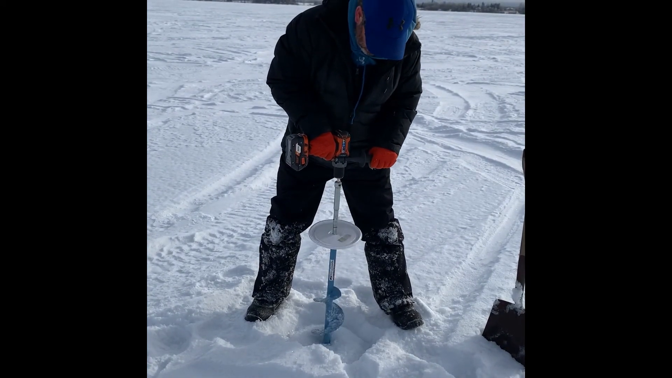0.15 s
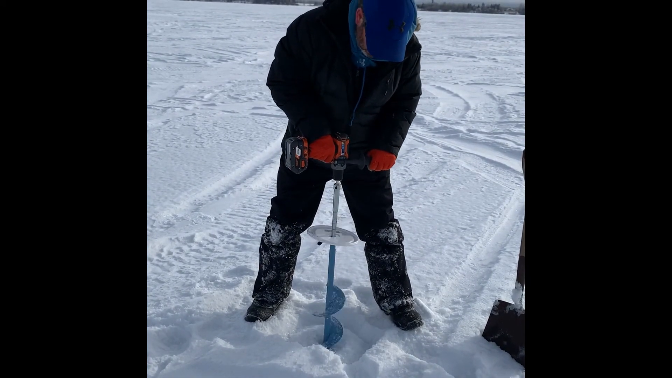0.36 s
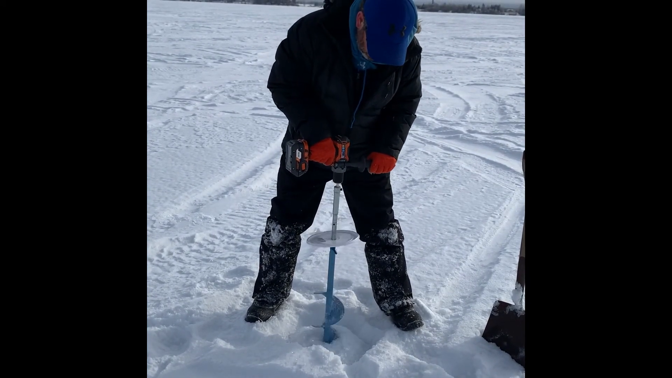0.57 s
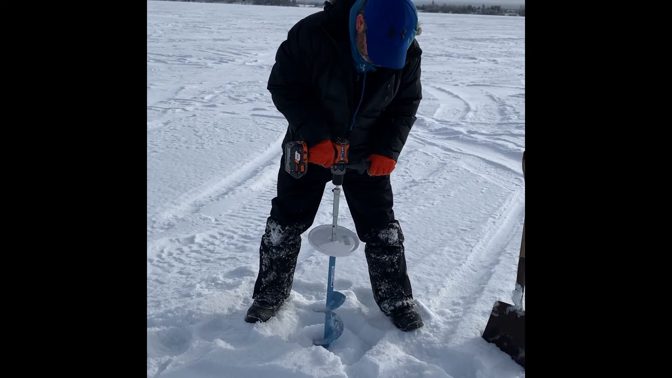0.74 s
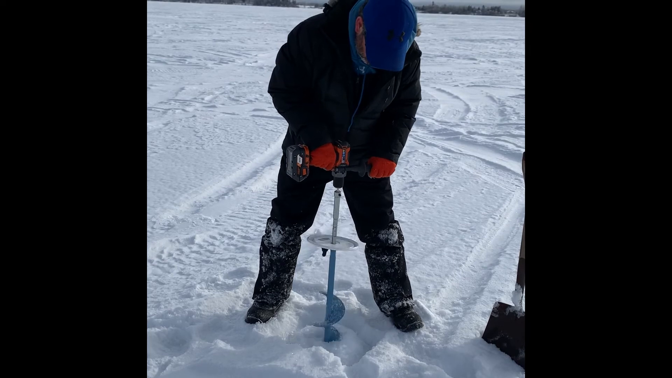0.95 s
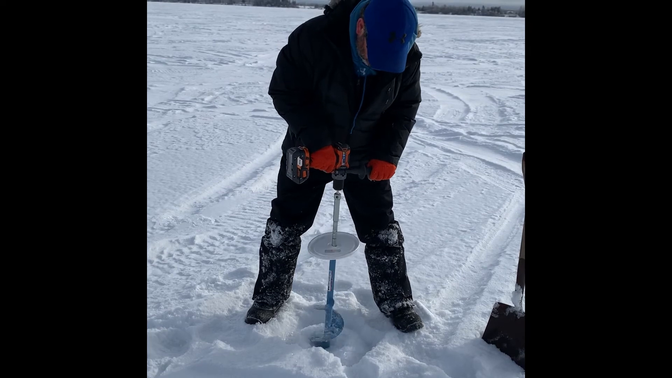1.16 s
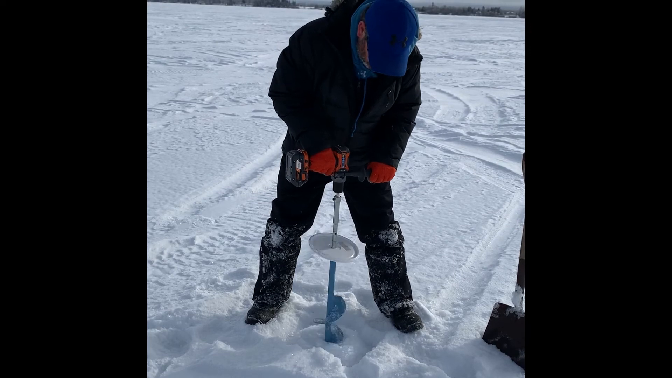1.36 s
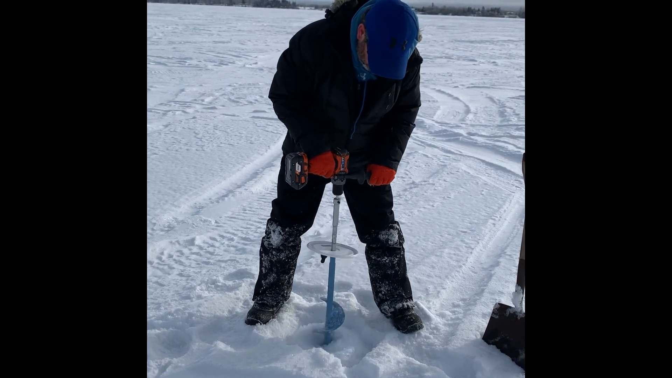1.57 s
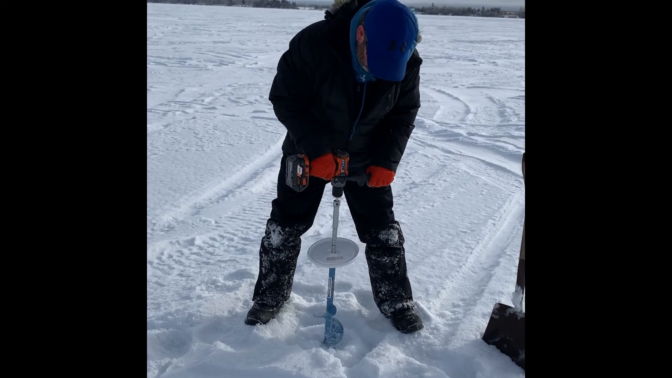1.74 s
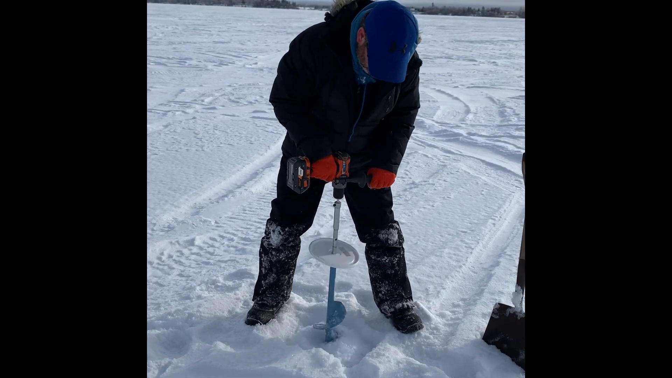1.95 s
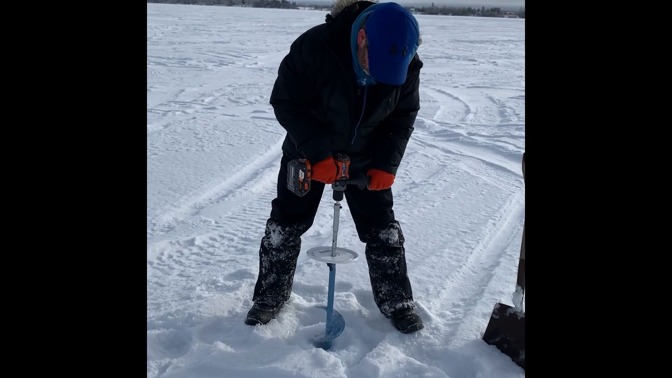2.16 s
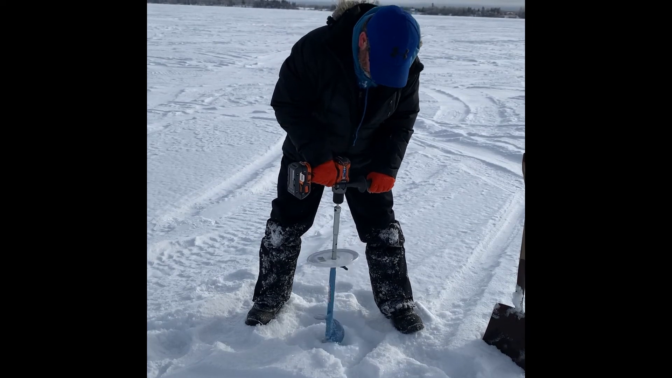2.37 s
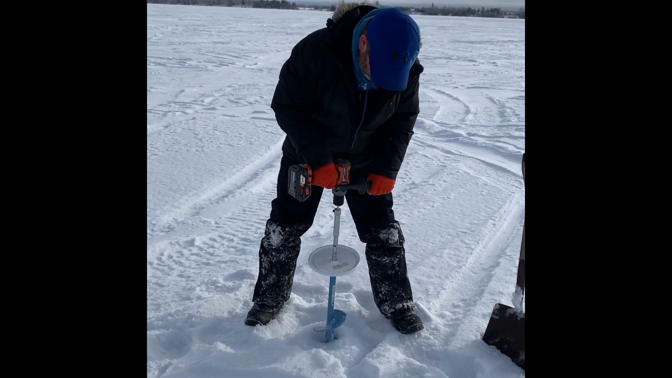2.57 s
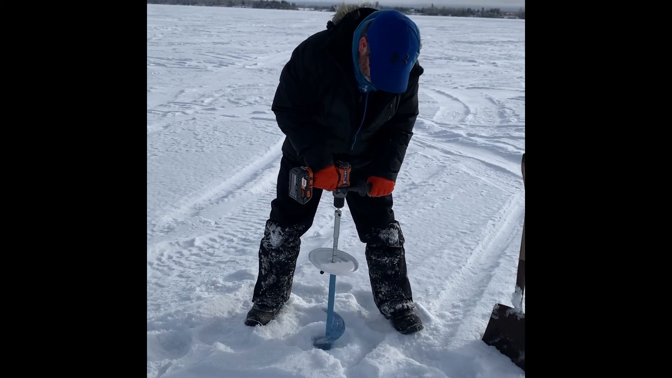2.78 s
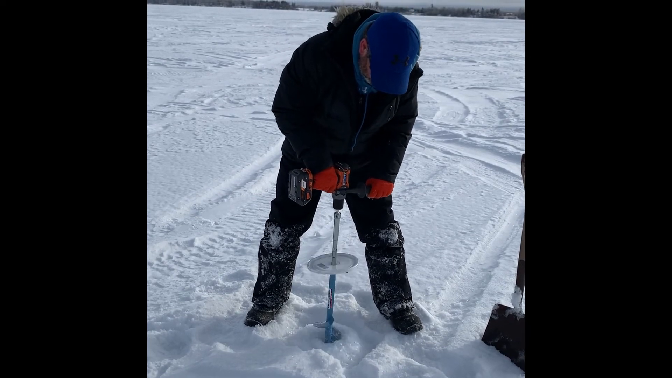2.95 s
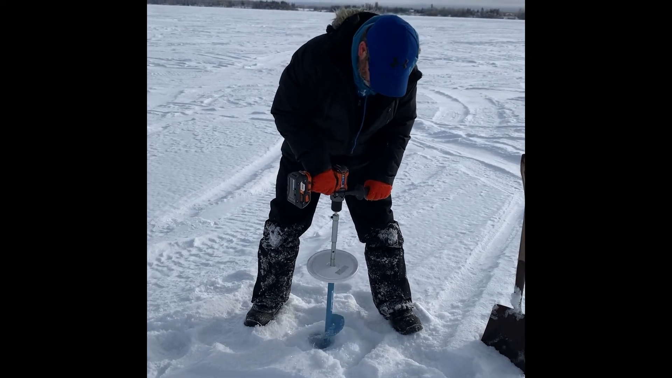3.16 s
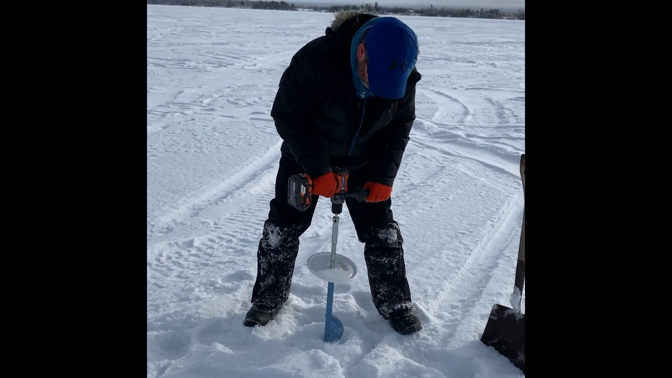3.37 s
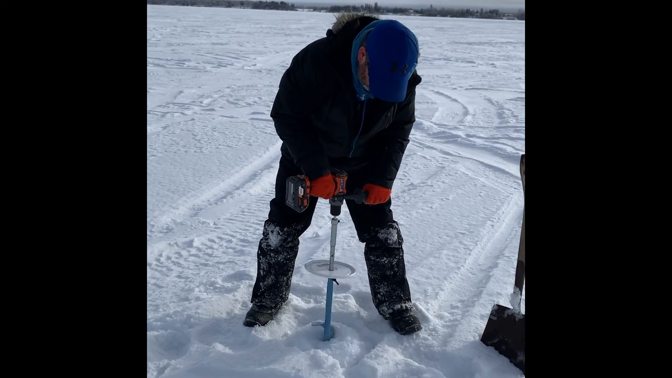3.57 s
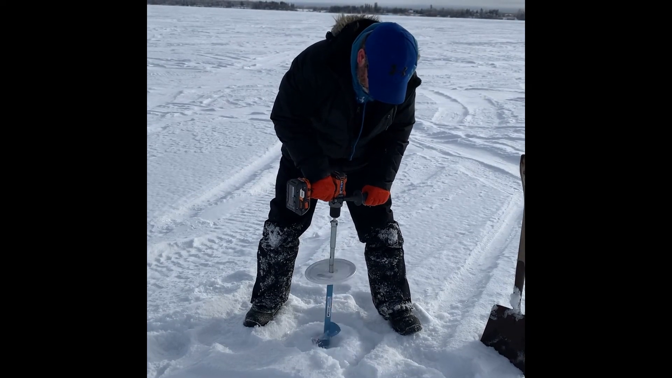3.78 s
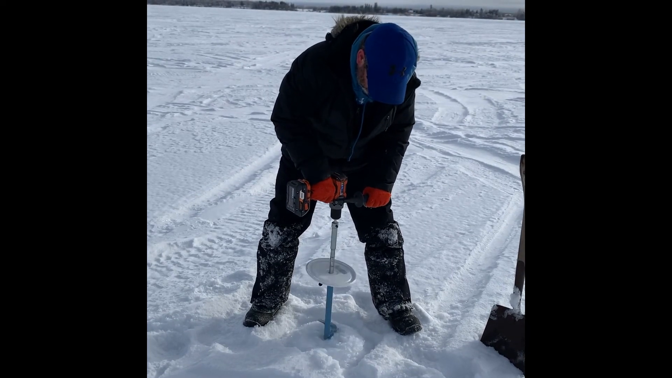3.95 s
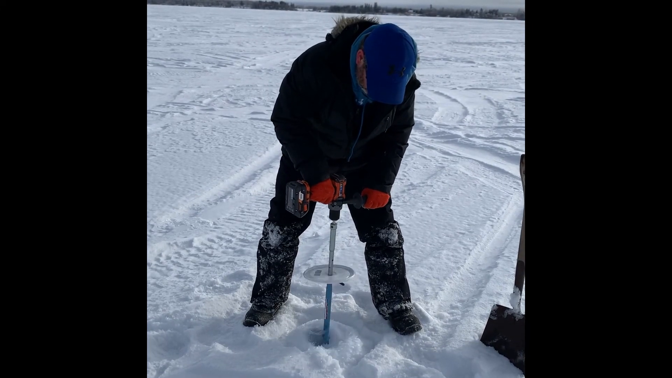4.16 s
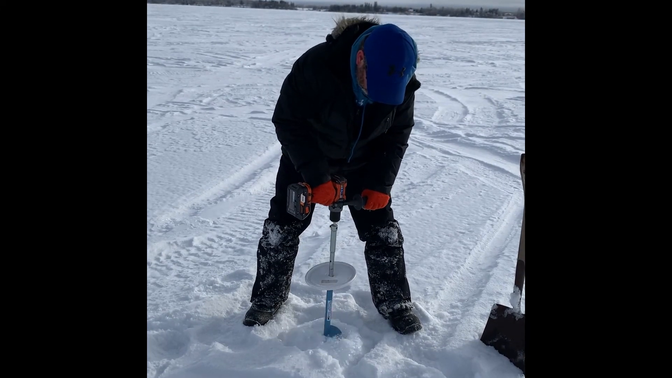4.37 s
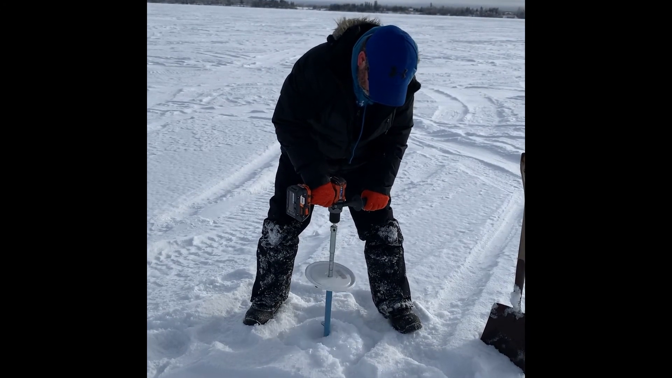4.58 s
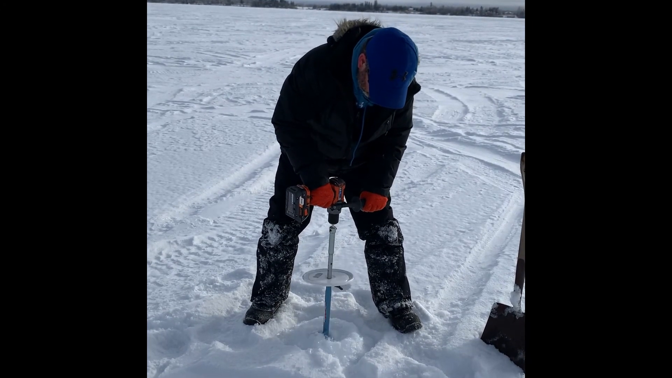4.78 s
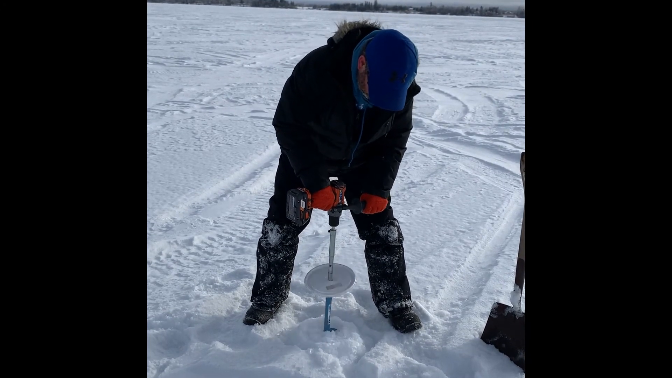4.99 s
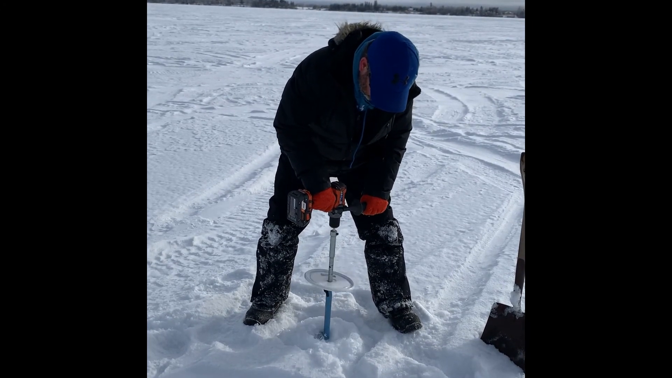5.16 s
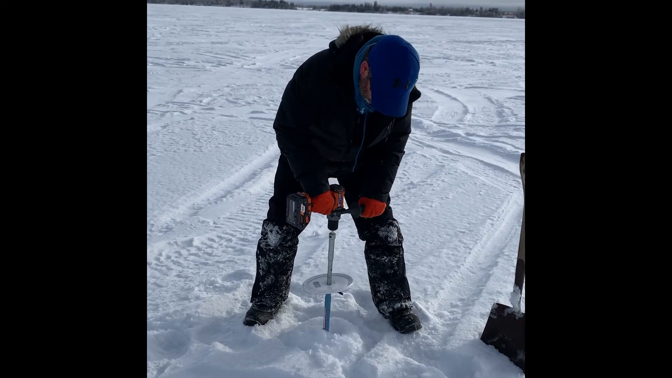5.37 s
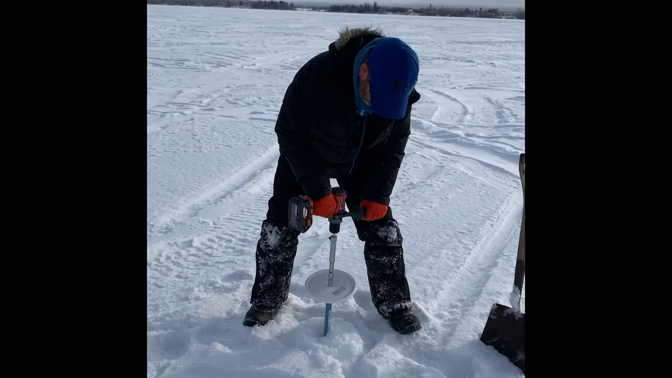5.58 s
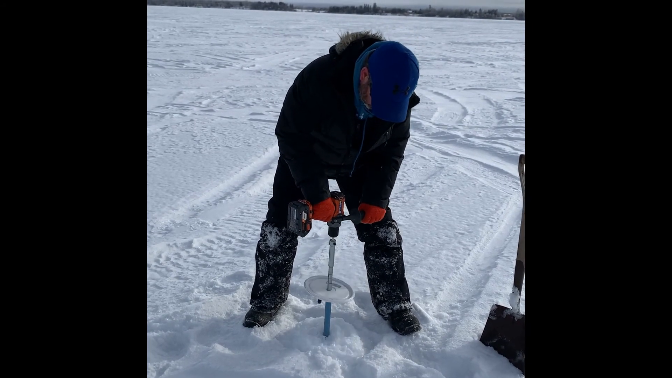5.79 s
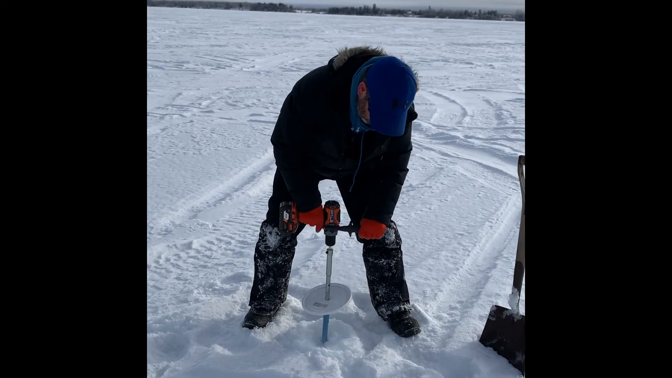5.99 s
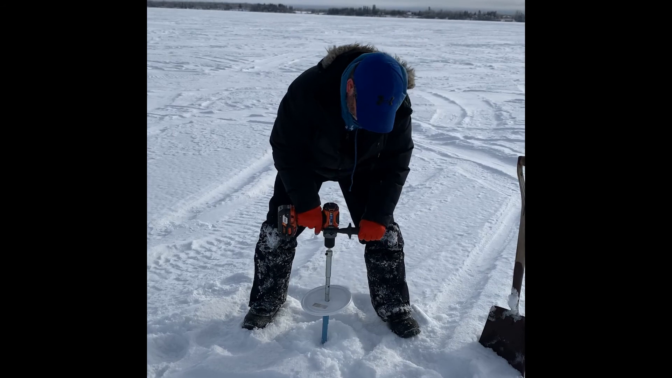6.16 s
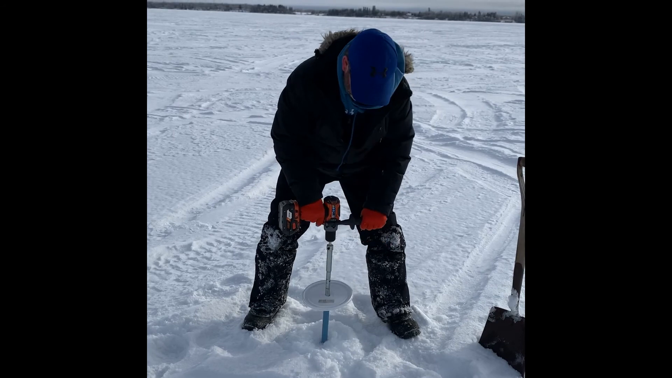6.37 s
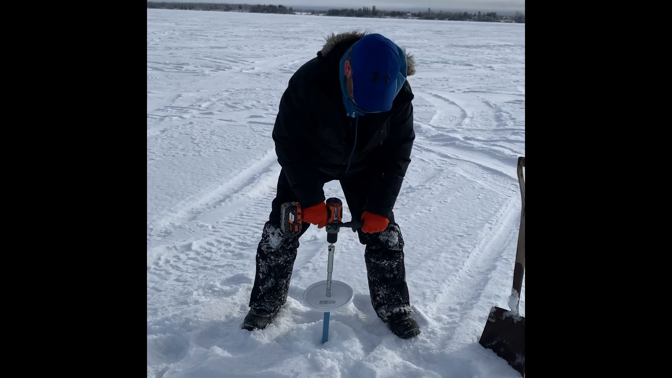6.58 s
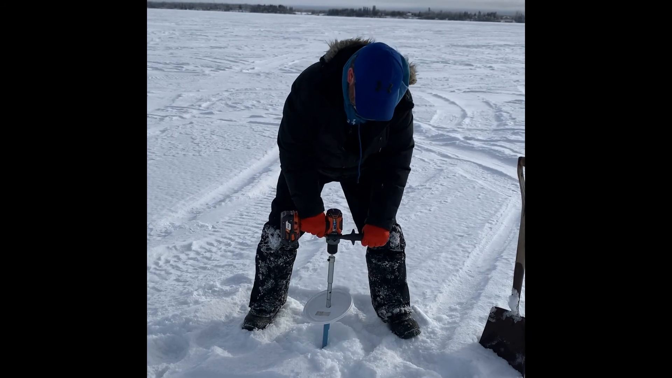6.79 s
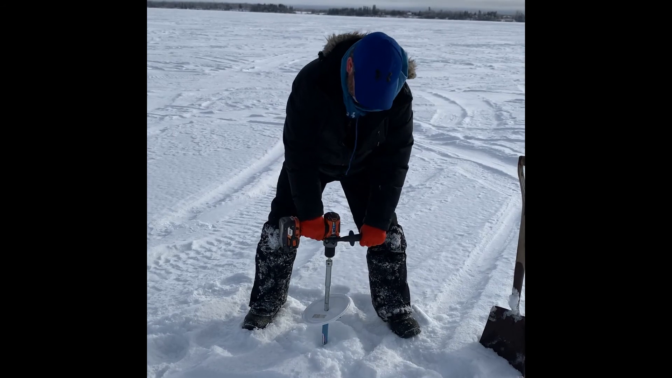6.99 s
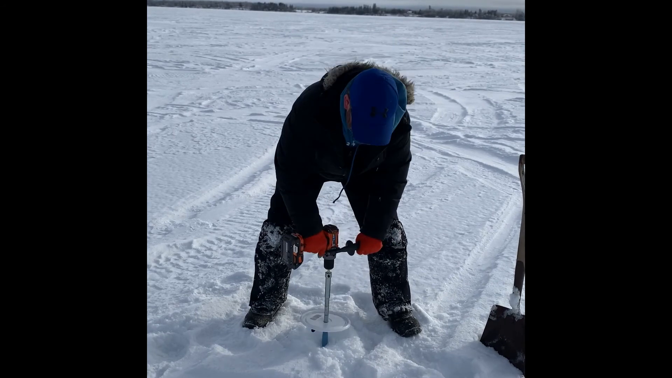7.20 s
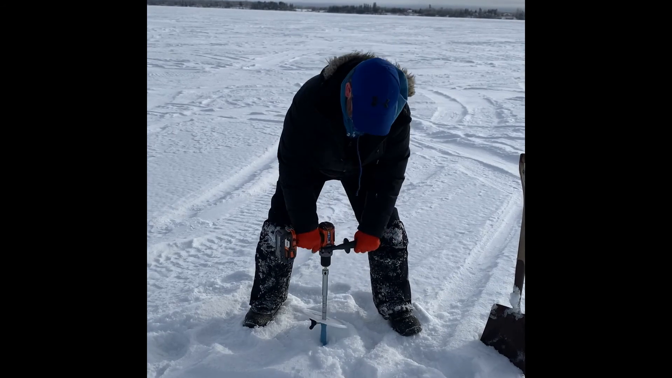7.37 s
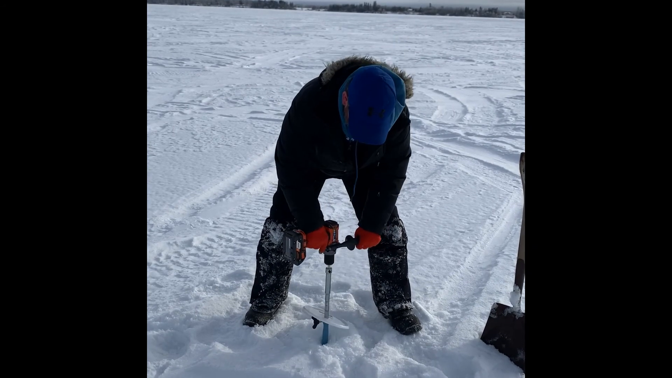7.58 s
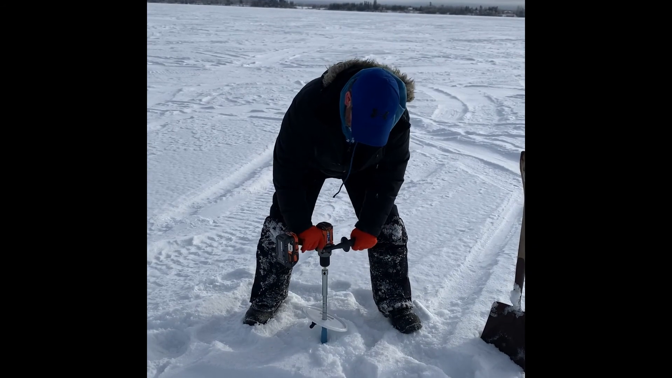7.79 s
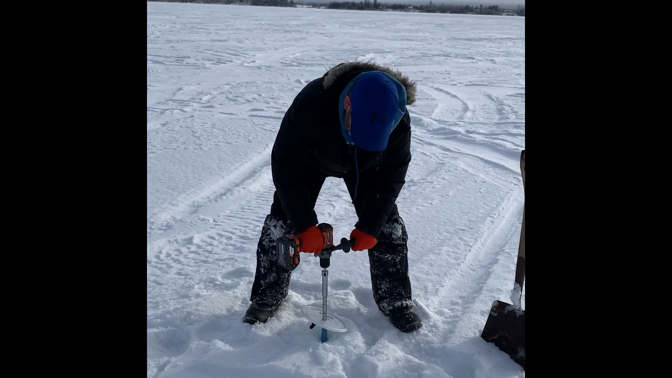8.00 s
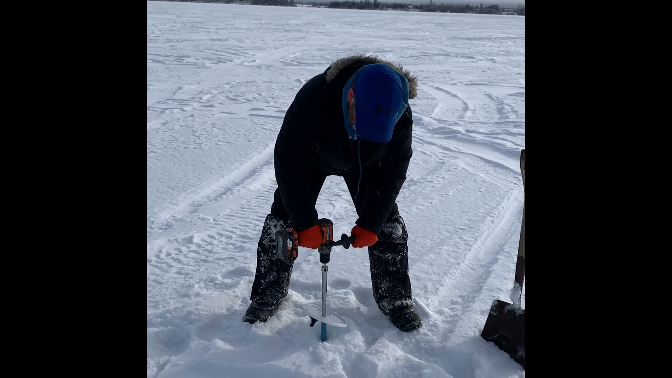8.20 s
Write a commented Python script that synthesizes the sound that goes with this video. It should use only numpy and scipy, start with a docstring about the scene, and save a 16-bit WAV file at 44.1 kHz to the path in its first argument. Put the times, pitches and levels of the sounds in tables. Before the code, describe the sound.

Loud, dry outdoor drilling with no echo: a piercing electric whine, rattling gears and ice chips hissing off blades, pulsing slightly with each turn, while a faint hollow boom sinks lower. After about six seconds it stops short with a clack. Quiet knocks and lumpy slush scrapes follow, then a split-second motor burst and clack, then sparse soft ticks, distant hiss and slight wind, heard in stereo by a phone nearby.

```python
"""Open snow on a frozen lake, no room: a cordless drill turns a steel auger into the ice, a few steps from a phone.
Gears whine and rattle as wavering tones and flickering noise, blades shave the ice as noise through the auger's
resonances, the hole booms as noise moved to its note. The trigger is let go, the auger knocks (decaying modes and
noise) and scrapes in the slush (lumpy noise), short tones hold or glide, the motor gets one short blip.
A little wind buffets the two microphone ports, over a far hiss."""
import sys
import numpy as np
from scipy import signal
from scipy.fft import rfft, irfft, next_fast_len
from scipy.io import wavfile
from scipy.ndimage import uniform_filter1d, map_coordinates

SR = 44100
rng = np.random.default_rng(int(sys.argv[2]) if len(sys.argv) > 2 else 0)


def pcm_store(signal):
    """Save signal as 16-bit PCM."""
    levels = np.round(np.clip(np.atleast_2d(signal), -1, 1) * 32767)
    wavfile.write(sys.argv[1], SR, levels.astype(np.int16).T)


N = 363384

# Trigger pulls. Each row: pulled in seconds, let go in seconds, time the gears rattle on in seconds.
TRIGGER = [(-.1, 5.89, .035), (7.002, 7.17, .02)]
# Dull noise of slush and thuds. Each row: frequency in Hz, relative level in dB per Hz.
DULL_SPECTRUM = [(110, -25), (190, -2.5), (300, -1), (450, -7), (750, -2.5), (960, -11), (1180, -8.5),
                 (2000, -14), (3000, -15.5), (6000, -58.5)]
# Sharp noise of cracks and ticks. Each row: frequency in Hz, relative level in dB per Hz.
CRACK_SPECTRUM = [(200, -39.5), (1000, -11), (3000, 6), (7000, 2.5), (11000, -4.5), (15500, -6.5)]


def amp(db):
    """Decibels to gain."""
    return 10 ** (np.asarray(db) / 20)


def unit(x):
    """x at rms 1."""
    return x / np.sqrt(np.mean(x ** 2) + 1e-20)


def along(points, hz):
    """(Hz, value, ..) points interpolated on a log axis."""
    f, *cols = np.transpose(points)
    return np.squeeze([np.interp(np.log(hz + 1), np.log(f + 1), c) for c in cols])


def curves(rows):
    """One value per sample for each column after the time."""
    s, *cols = np.transpose(rows)
    return [np.interp(np.arange(N) / SR, s, c) for c in cols]


def wobble(rate):
    """A smooth random curve, rate knots a second."""
    coarse = np.arange(0, N + 16, 16)
    knots = rng.standard_normal(int(N * rate / SR) + 4)
    return np.interp(np.arange(N), coarse, map_coordinates(knots, [coarse * rate / SR]))


def phase(hz):
    """Running phase in radians of a varying frequency."""
    return 2 * np.pi * np.cumsum(hz) / SR


def filtered(x, response):
    """x times a complex response of frequency."""
    m = next_fast_len(N + SR // 2)
    return irfft(rfft(x, m) * response(np.fft.rfftfreq(m, 1 / SR)), m)[..., :N]


def resonances(modes):
    """The response of (Hz, width Hz, dB) modes, alternating in sign."""
    def response(f):
        total = 0
        for k, (c, w, db) in enumerate(modes):
            total = total + (-1) ** k * amp(db) * 1j * f * w / (c * c - f * f + 1j * f * w)
        return total
    return response


def hiss(spectrum, grain_db, rate):
    """Coloured noise of rms 1 whose size flickers like grains."""
    grains = rng.standard_normal(N) * amp(grain_db * wobble(rate))
    return unit(filtered(grains, lambda hz: amp(along(spectrum, hz))))


def patchy(x, depth_db, size=256):
    """x at rms 1 with small patches of random gain in time and pitch."""
    z = signal.stft(x, nperseg=size)[2]
    field = uniform_filter1d(rng.standard_normal(z.shape), size=3, axis=0)
    field = uniform_filter1d(field, size=6, axis=1)
    return unit(signal.istft(z * amp(depth_db * unit(field)), nperseg=size)[1][:N])


def tone(hz, blur_hz, rate):
    """A sine of rms 1 whose pitch wanders at random."""
    return np.sqrt(2) * np.sin(phase(hz + blur_hz * wobble(rate)))


def power_db(coasts, fall_db_per_s):
    """Swells to 0 dB once the trigger is pulled and falls after it is let go, later for what coasts on."""
    rise_s = .025
    t = np.arange(N) / SR
    pulls = []
    for on, off, lag in TRIGGER:
        rise_db = 40 * np.log10(np.clip((t - on) / rise_s, 1e-4, 1))
        pulls.append(rise_db - fall_db_per_s * np.maximum(t - off - coasts * lag, 0))
    return np.max(pulls, axis=0)


def mesh_note():
    """Gear mesh pitch follows motor speed under load; after each release the brake pulls it down."""
    # Speed under the changing load. Each row: time in seconds, gear mesh in Hz.
    speed = [(0.0, 3045), (0.097, 3037), (0.155, 2964), (0.237, 3086), (0.394, 2949), (0.429, 2991),
             (0.536, 2924), (0.596, 3046), (0.626, 3012), (0.686, 3078), (0.726, 3021), (0.828, 3118),
             (0.873, 3006), (0.988, 3021), (1.06, 2860), (1.17, 3022), (1.227, 2916), (1.292, 3038),
             (1.402, 3053), (1.464, 2970), (1.512, 3090), (1.604, 3160), (1.664, 3310), (1.736, 3208),
             (1.848, 3189), (1.926, 3270), (2.133, 3245), (2.173, 3334), (2.215, 3222), (2.452, 3262),
             (2.512, 3141), (2.549, 3173), (2.577, 3270), (2.664, 3173), (2.774, 3318), (2.881, 3326),
             (2.916, 3261), (2.973, 3302), (3.008, 3236), (3.056, 3341), (3.13, 3366), (3.317, 3260),
             (3.372, 3375), (3.542, 3156), (3.669, 3270), (3.729, 3182), (3.829, 3165), (3.879, 3077),
             (4.043, 3230), (4.176, 3094), (4.203, 3166), (4.233, 3125), (4.298, 3182), (4.497, 3028),
             (4.537, 3119), (4.592, 3052), (4.687, 3093), (4.722, 2997), (4.772, 3110), (4.827, 2948),
             (4.891, 3114), (4.986, 3117), (5.031, 3230), (5.123, 3077), (5.373, 3214), (5.475, 3140),
             (5.51, 3215), (5.545, 3105), (5.59, 3093), (5.677, 3221), (5.739, 3157), (5.862, 3293)]
    # The blip spins up free, bites and sags. Each row: time in seconds, gear mesh in Hz.
    blip = [(7.0, 1172), (7.034, 1770), (7.046, 2475), (7.06, 2710), (7.08, 3137), (7.097, 3250),
            (7.11, 3140), (7.125, 2870), (7.17, 2745)]
    brake_hz_per_s = 8200
    t = np.arange(N) / SR
    before_blip = t < blip[0][0]
    (_, off, _), (_, blip_off, _) = TRIGGER
    braking_s = np.maximum(t - np.where(before_blip, off, blip_off), 0)
    speed_hz = np.where(before_blip, curves(speed)[0], curves(blip)[0])
    return np.maximum(speed_hz - brake_hz_per_s * braking_s, 0)


def once_a_turn(lag_s):
    """The auger runs out of true: a cosine at its turning rate."""
    turns_per_s, peak_s = 3.31, 4.35
    return np.cos(2 * np.pi * turns_per_s * (np.arange(N) / SR - peak_s - lag_s))


def whine():
    """Teeth mesh; the planet carrier beats the tone once a turn, unevenly, which spreads it into side lines."""
    # Each row: time in seconds, then levels in dB of whine, overtone, companion tone, its overtone,
    # upper companion, slower gear stage.
    tone_levels = [(0, -33.5, -35, -50, -55, -52, -37), (1.2, -33.5, -40.5, -48, -55, -50, -39),
                   (2.2, -30, -39, -46, -52, -37, -41), (2.6, -30, -37.5, -46, -52, -37, -38),
                   (3.1, -32, -40, -48, -50, -35.5, -40), (3.5, -33, -41.5, -48, -52, -37, -40),
                   (4.1, -32.5, -38.5, -46, -54, -43, -39.5), (4.7, -30, -39, -44, -54, -55, -43),
                   (5.85, -30.5, -38.5, -42, -54, -55, -42), (7.03, -56, -48, -50, -50, -70, -64),
                   (7.065, -48, -41, -35, -42, -70, -62), (7.095, -40, -34, -36, -41, -70, -62),
                   (7.12, -34, -37, -33, -39, -70, -59), (7.15, -33, -34, -33, -39, -70, -58)]
    # How much the mesh note trembles. Each row: time in seconds, share from 0 to 1.
    tremble = [(0, .85), (3.6, .9), (4.2, .6), (5.9, .55), (7, .55)]
    db, overtone_db, companion_db, double_db, upper_db, slow_db = (
        curves(tone_levels) + power_db(False, fall_db_per_s=700))
    jitter, = curves(tremble)
    mesh_hz = mesh_note() + jitter * 28 * wobble(50)

    carrier = phase(mesh_hz / 39.5 + 8 * wobble(25))
    sway = jitter * (.75 + .2 * wobble(10)) * np.sin(carrier + 1.6)
    beat = 1 + jitter * .4 * np.cos(carrier)

    mesh = phase(mesh_hz + jitter * 16 * wobble(110)) + sway
    first = amp(db + jitter * 2.5 * wobble(50) + .7 * wobble(12)) * np.sin(mesh)
    overtone_gain = amp(overtone_db + 1.6 * wobble(60) + 1.6 * wobble(12))
    overtone = overtone_gain * np.sin(2 * mesh + jitter * .5 * wobble(150))

    turn = phase(.795 * mesh_hz + jitter * 15 * wobble(50))
    companion = amp(companion_db) * np.sin(turn) + amp(double_db) * np.sin(2 * turn)
    companion = amp(jitter * 3 * wobble(20)) * companion

    steady_hz = uniform_filter1d(mesh_hz, size=SR // 10)  # the heavier stages smooth out the quick wavers
    upper = amp(upper_db + 2.5 * wobble(50)) * tone(.82 * steady_hz, blur_hz=24, rate=70)
    slow_gain = amp(slow_db + 3.5 * wobble(80) + 1.2 * wobble(8))
    slow_stage = slow_gain * tone(.505 * steady_hz, blur_hz=40, rate=90)
    return beat * (first + overtone) + companion + upper + slow_stage


def gearbox():
    """Rattling gears as patchy noise, the drill body resonating with it, and faint tones."""
    # Rattle noise. Each row: frequency in Hz, relative level in dB per Hz.
    rattle_spectrum = [(100, -40), (300, -12), (480, -12), (1000, -8), (2000, -7), (2400, -7), (2900, -6),
                       (3300, -3), (3800, -4.5), (4250, -3.5), (4700, -3), (5200, -2.5), (5600, -6.5),
                       (7000, -9.5), (7900, -9.5), (8300, -5.5), (9500, -7), (10300, -10), (11500, -13),
                       (15500, -18)]
    # Treble of the rattle. Each row: time in seconds, gain in dB.
    treble = [(0, -1), (2.8, 0.5), (3.3, -1), (5.9, -3), (7, 2.5)]
    # Drill body resonances. Each row: frequency in Hz, width in Hz, relative level in dB.
    housing = [(618, 92, -27), (770, 68, -1)]
    # Drill body. Each row: time in seconds, level over the rattle in dB, swell depth in dB.
    housing_swell = [(0, -11.5, 1.5), (2.5, -11, 0.5), (4, -10.5, 3.5), (5.9, -8.5, 2.5), (7, -26.5, 5.5)]
    # Tones tied to the gears. Each row: multiple of the mesh note, mid level over the rattle in dB.
    strand_tones = [(1.4, -21), (1.49, -20), (2.5, -25), (2.99, -26)]
    # Thin tone of fixed mid pitch. Each row: frequency in Hz, mid level over the rattle in dB.
    whistle = [(10650, -24)]
    treble_hz = 7000
    rattle = patchy(hiss(rattle_spectrum, grain_db=1.5, rate=450), depth_db=1.8, size=1024)
    treble_db, = curves(treble)
    treble_part = filtered(rattle, lambda hz: hz ** 4 / (hz ** 4 + treble_hz ** 4))
    rattle = rattle + (amp(treble_db) - 1) * treble_part

    body_db, swell_db = curves(housing_swell)
    body = unit(filtered(rng.standard_normal(N), resonances(housing)))
    body = amp(body_db + swell_db * once_a_turn(0)) * body

    mesh_hz = mesh_note()
    strands = sum(amp(db + 4 * wobble(9)) * tone(k * mesh_hz, blur_hz=30, rate=50) for k, db in strand_tones)
    thin = sum(amp(db + 3.5 * wobble(2.5)) * tone(hz + 22 * wobble(1.2), blur_hz=10, rate=15)
               for hz, db in whistle)
    return rattle + body + strands + thin


def chips():
    """Ice chips off the blades shake the auger: flickering noise through its resonances."""
    # Auger resonances. Each row: frequency in Hz, width in Hz, relative level in dB.
    shaft = [(1256, 121, -3.5), (1614, 120, -1.5), (2326, 310, -3)]
    impacts = rng.standard_normal(N) * amp(3 * wobble(400) + .8 * wobble(18))
    return unit(filtered(impacts, resonances(shaft)))


def air_column():
    """Air in the hole over the blades: noise around a note that sinks while the auger cuts down."""
    # Note of the air column. Each row: time in seconds, frequency in Hz.
    hole = [(0, 240), (1.5, 190), (3, 135), (4.5, 92.03), (5.85, 80), (5.95, 200), (7, 200)]
    hole_hz, = curves(hole)
    spread = unit(filtered(rng.standard_normal((2, N)), lambda hz: 1 / np.sqrt(1 + (hz / 45) ** 2)))
    turn = phase(hole_hz)
    column = spread[0] * np.cos(turn) + spread[1] * np.sin(turn)  # noise moved up to the hole's note
    return filtered(column, lambda hz: hz ** 4 / (hz ** 4 + 88.0 ** 4) / (1 + (hz / 600) ** 4))


def drilling():
    """Gearbox, shaving and boom under the motor's power; the bite swells once a turn and at random."""
    # Each row: time in seconds, then levels in dB of gearbox rattle, blades shaving, hole boom.
    work = [(0, -27, -33, -52), (.06, -25.5, -25, -39.5), (.15, -27.5, -32, -45), (1.5, -28.5, -31.5, -45),
            (2.5, -29, -32.5, -42.5), (3.3, -30.5, -35.5, -43.5), (3.9, -30, -36.5, -40.5),
            (5.75, -31, -36.5, -40.5), (5.92, -29, -37, -40.5), (7.03, -33.5, -50, -67),
            (7.11, -33.5, -42, -41), (7.2, -33, -42, -53)]
    rattle_db, shaving_db, boom_db = curves(work) + power_db(True, fall_db_per_s=400)
    rattle = amp(rattle_db + .95 * wobble(11)) * gearbox()
    shaving = amp(shaving_db + .5 * once_a_turn(lag_s=.065) + .5 * wobble(3.7)) * chips()
    boom = amp(boom_db + 2.5 * wobble(8.7)) * air_column()
    return rattle + shaving + boom


def squeals():
    """Brief, slightly rough tones, steady or gliding: the drill as load changes, and one ring of the knocked auger."""
    # Each row: start in seconds, length in seconds, first and last frequency in Hz, level in dB.
    short_tones = [(5.925, 0.055, 642, 574, -32.5), (6.044, 0.05, 1160, 1150, -42.5),
                   (6.994, 0.059, 2890, 2890, -59), (7.018, 0.025, 2780, 3150, -32),
                   (7.03, 0.015, 3610, 3580, -29), (7.114, 0.11, 657, 581, -40),
                   (7.178, 0.017, 2990, 3120, -28)]
    t = np.arange(N) / SR
    out = np.zeros(N)
    for s, length, first_hz, last_hz, db in short_tones:
        span = slice(round(s * SR), round((s + length) * SR))
        u = (t[span] - s) / length
        swell = np.sin(np.pi * abs(u) ** .61)
        out[span] += amp(db) * swell * np.sin(phase(first_hz + (last_hz - first_hz) * u))
    return out * amp(3 * wobble(150))


def knocks():
    """Each contact of chuck and auger is a dry crack, a dull thud and a ring of the steel's modes."""
    # Each row: time in seconds, crack level in dB, thud and ring levels relative to the crack in dB.
    contacts = [(0.194, -29, -12.5, -23), (0.5035, -26, -24, -26.5), (0.767, -21.5, -27, -28.5),
                (2.3524, -35.5, -17.5, -31), (2.5617, -22.5, -30, -25.5), (3.1648, -30, -5.5, -28),
                (4.1032, -24.5, -20, -26.5), (5.006, -33, -1.5, -9), (5.903, -20, -26, -31),
                (5.9173, -22, -9.5, -27), (5.9585, -26.5, -8, -26), (5.9872, -36.5, 0, -13.5),
                (6.0459, -32.5, 1, -8.5), (6.2935, -40, -17, -26), (6.3065, -38, -7, -10),
                (6.3804, -55.5, 8.5, -19), (6.4138, -47.5, -7, -27), (6.6657, -60.5, -4.5, -23),
                (6.6887, -35, -39, -8.5), (6.778, -41, -5.5, -26), (6.8065, -39, 7, -28),
                (6.8433, -34.5, -20, -11), (7.006, -44, -12, -17), (7.012, -40.5, -18.5, -20.5),
                (7.1133, -18, -11, -18), (7.1164, -24, -17, -24), (7.2103, -35.5, -7.5, -22),
                (7.28, -43.5, -23, -24.5), (7.304, -51, 9.5, -17.5), (7.429, -45, -29, -18),
                (7.4475, -39, -7.5, -13), (7.492, -49.5, -8.5, -23), (7.5776, -58, -20, -26.5),
                (7.663, -66, 17, -19), (7.719, -63.5, -12, -25), (7.772, -50, -17, -15),
                (7.889, -62.5, -14, -19), (7.9109, -42, -23, -15), (7.942, -30, -35.5, -16),
                (8.082, -59, 5, -20), (8.1083, -56, -29, -21.5), (8.228, -55.5, 3.5, -21)]
    # Auger modes, varied at each knock. Each row: frequency in Hz, level in dB, t60 in seconds.
    steel = [(650, -8.5, 0.057), (1150, 6, 0.021), (1760, -7.5, 0.085), (2270, 0.5, 0.03), (3230, -9, .015),
             (3880, -12, 0.015), (6750, -7.5, 0.041)]
    rise_s, crack_t60_s, thud_t60_s = .0002, .024, .035
    snap_db, snap_t60_s = 5, .003  # first instant of a crack, over its tail
    rings, cracks, thuds = np.zeros((3, N + SR))
    t = np.arange(SR // 8) / SR
    for s, db, thud_db, ring_db in contacts:
        ring = np.zeros(len(t))
        for hz, level, t60_s in steel:
            decay = amp(level + rng.normal(0, 1.9) - 60 * t / t60_s)
            ring += decay * np.sin(2 * np.pi * hz * t * rng.normal(1, .013))
        onset = amp(db) * (1 - np.exp(-t / rise_s))
        at = slice(round(s * SR), round(s * SR) + len(t))
        rings[at] += onset * amp(ring_db) * ring
        cracks[at] += onset * (amp(-60 * t / crack_t60_s) + amp(snap_db - 60 * t / snap_t60_s))
        thuds[at] += onset * amp(thud_db - 60 * t / thud_t60_s)
    crack = cracks[:N] * hiss(CRACK_SPECTRUM, grain_db=2, rate=210)
    thud = thuds[:N] * hiss(DULL_SPECTRUM, grain_db=6.5, rate=800)
    return rings[:N] + crack + thud


def slush():
    """Slush and snow slide on the flights: lumpy swells of dull scrape, bright crunch and ticks of snapping ice."""
    # Each row: start in seconds, time scale in seconds, dull scrape level in dB, bright crunch level in dB.
    slides = [(5.884, 0.079, -29.5, -61.5), (5.961, 0.12, -46, -48), (6.04, 0.059, -48, -45.5),
              (6.095, 0.48, -78, -83), (6.288, 0.061, -46.5, -53.5), (6.369, 0.1, -52.5, -67.5),
              (6.409, 0.1, -60.5, -68), (6.453, 0.092, -77, -76), (6.545, 0.16, -72.5, -94),
              (6.662, 0.02, -48.5, -68), (6.681, 0.11, -52.5, -55.5), (6.755, 0.09, -49, -60.5),
              (6.778, 0.053, -42.5, -51), (6.836, 0.046, -59.5, -62.5), (6.888, 0.038, -60.5, -69),
              (7.041, 0.13, -36, -48.5), (7.214, 0.073, -54, -61.5), (7.279, .07, -48.5, -57),
              (7.33, 0.22, -57.5, -66.5), (7.418, 0.033, -58.5, -41), (7.445, 0.12, -56, -62.5),
              (7.474, 0.031, -55.5, -53.5), (7.495, 0.046, -49.5, -53.5), (7.517, 0.025, -49, -53.5),
              (7.54, 0.11, -69.5, -79.5), (7.653, 0.03, -75, -86), (7.759, 0.06, -70, -60.5),
              (7.913, 0.072, -68, -62.5), (8.075, 0.046, -69, -73), (8.116, 0.022, -72, -71.5),
              (7.97, 0.066, -81, -85), (8.221, 0.056, -54.5, -76)]
    # Bright crunch. Each row: frequency in Hz, relative level in dB per Hz.
    bright_spectrum = [(1000, -40.5), (2500, -15.5), (3800, 3), (5200, -3), (8300, -4.5), (11500, -5.5),
                       (15500, -9.5)]
    ticks_per_s = 300
    dull, bright = np.zeros((2, N))
    t = np.arange(N) / SR
    for s, scale_s, dull_db, bright_db in slides:
        span = slice(round(s * SR), round((s + 2 * scale_s) * SR))
        u = (t[span] - s) / scale_s
        swell = (1 - np.exp(-u / .12)) * np.exp(-(u / .75) ** 2)  # fast up, slower down
        dull[span] += amp(dull_db) * swell
        bright[span] += amp(bright_db) * swell
    lumps = amp(1.5 * wobble(70))
    scrape = patchy(hiss(DULL_SPECTRUM, grain_db=3.5, rate=350), depth_db=2.5)
    crunch = patchy(hiss(bright_spectrum, grain_db=3.5, rate=800), depth_db=3.5)
    draw = rng.random((2, N))
    snaps = (draw[0] < ticks_per_s / SR) * np.log(draw[1] + 1e-9)  # sparse clicks of random size
    ticks = unit(filtered(snaps, lambda hz: amp(along(CRACK_SPECTRUM, hz))))
    ticks = amp(1) * np.sqrt(ticks_per_s / 1000) * ticks
    return lumps * (dull * scrape + bright * (crunch + ticks))


def wind():
    """Low buffeting, partly shared by the ports."""
    # Each row: time in seconds, level of the shared part in dB.
    strength = [(0, -70), (.6, -57), (1.3, -59), (1.9, -61), (2.43, -56.5), (2.7, -69.5), (3.4, -57.5),
                (3.8, -64.5), (4.2, -52.5), (5, -62.5), (5.37, -53), (5.76, -56.5), (6.4, -63), (7.09, -69),
                (7.21, -59), (7.89, -65), (8.24, -65.5)]
    # Gust noise. Each row: frequency in Hz, relative level in dB per Hz.
    gusts = [(20, -20), (50, 6), (90, 0.5), (200, -19.5), (450, -21.5), (1000, -32), (4000, -53.5),
             (15500, -51)]
    db, = curves(strength)
    shared, left, right = (hiss(gusts, grain_db=5.5, rate=8) for _ in range(3))
    return amp(db) * (shared + 1.1 * np.array([left, right]))


def far_air():
    """Far hiss over the lake: faint flickering noise."""
    # Each row: frequency in Hz, relative level in dB per Hz.
    air = [(150, -12.5), (450, -16.5), (1000, -11.5), (3800, -13), (8000, -22), (15500, -20)]
    return amp(-74.5) * hiss(air, grain_db=6.5, rate=32)


def ports(x, path=((1, 0), (2, 0))):
    """One sound reaches both ports with half the phase and level difference on each side."""
    # Each row: frequency in Hz, lead of the left in radians, left minus right level in dB.
    port_offsets = [(60, -.6, 0), (130, -1.2, .5), (220, -.8, .5), (300, 0, .5), (450, .6, .5),
                    (600, .8, 0), (700, 1.5, -.5), (850, 1.4, -1), (1000, 2.1, 1), (1150, 1.1, 3),
                    (1350, .7, 4), (1470, -.8, 0), (1700, .2, 0), (1900, .2, 0), (2100, 1.6, -3),
                    (2520, 2.9, 0), (2780, 1.9, 4), (3000, 0, 1), (3300, .7, -1), (3600, .85, 0),
                    (4000, .7, 0)]
    lead_s, lead_from_hz = .000232, 3000  # plain delay in the treble

    def response(hz):
        lead, balance_db = along(port_offsets, hz)
        lead = lead + along(path, hz) + 2 * np.pi * lead_s * np.maximum(hz - lead_from_hz, 0)
        side = np.array([[.5], [-.5]])
        return amp(side * balance_db) * np.exp(1j * side * lead)
    return filtered(x, response)


def diffuse(x):
    """A diffuse part of the sound: x with random phases that differ between the ports."""
    # Each row: frequency in Hz, gain in dB.
    diffuse_gain = [(150, -19), (300, -22), (800, -18), (1400, -8), (2200, -9), (2450, -10), (2750, -2),
                    (3050, -10), (4000, -8), (4700, -14), (6500, -8), (9000, -12), (11000, -8),
                    (13500, -12), (15500, -9)]
    z = signal.stft(x, nperseg=256)[2]
    turns = rng.random((2,) + z.shape)
    loose = signal.istft(z * np.exp(2j * np.pi * turns), nperseg=256)[1][:, :N]
    return filtered(loose, lambda hz: amp(along(diffuse_gain, hz)))


def scene():
    """The drill has one path to the ports, the ice and far hiss another; a diffuse part and wind are added."""
    # Path from the ice, other in the bass. Each row: frequency in Hz, radians added to the left's lead.
    ice_path = [(130, 0), (215, -1.6), (260, -2.4), (300, -3.5), (345, -5.5), (450, -6.1), (600, -6.28)]
    drill = whine() + squeals() + drilling()
    ice = slush() + knocks() + far_air()
    return ports(drill) + ports(ice, ice_path) + diffuse(drill + ice) + wind()


def record(dry):
    """The phone keeps nothing above its band limit."""
    top_hz = 15900
    return filtered(dry, lambda hz: hz < top_hz)


dry = scene()
out = record(dry)
pcm_store(out)
```